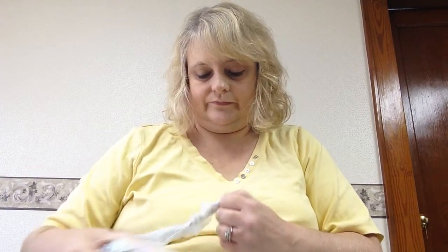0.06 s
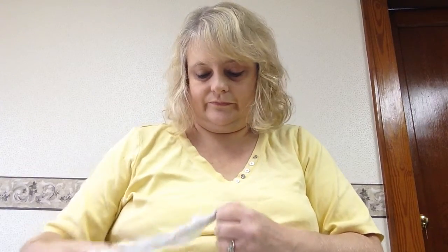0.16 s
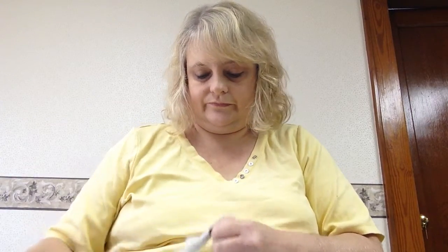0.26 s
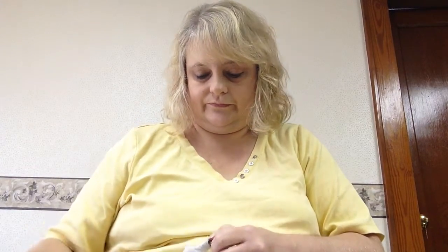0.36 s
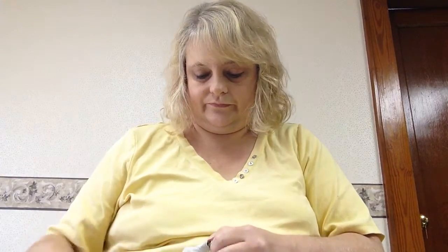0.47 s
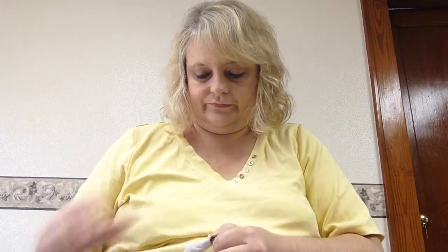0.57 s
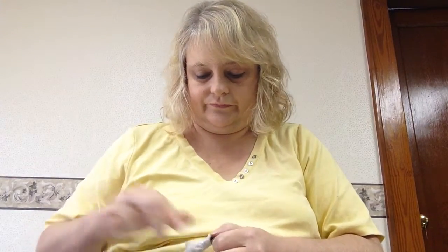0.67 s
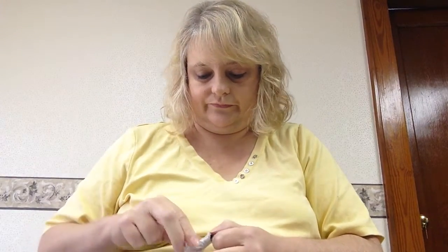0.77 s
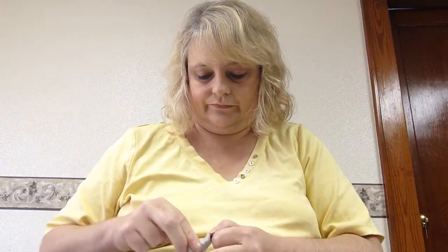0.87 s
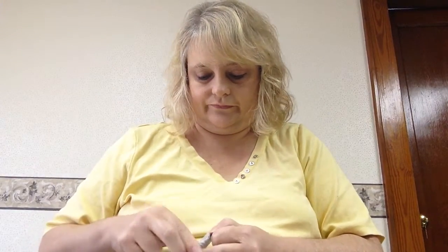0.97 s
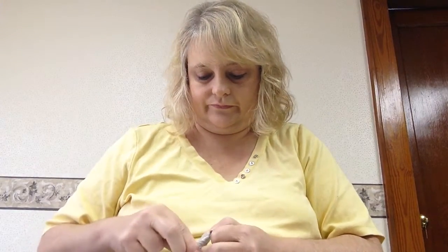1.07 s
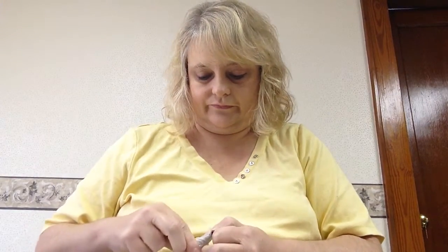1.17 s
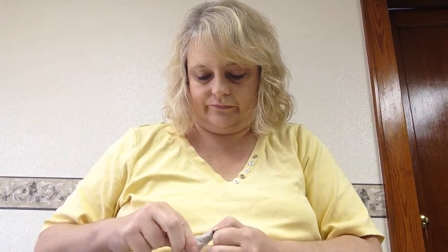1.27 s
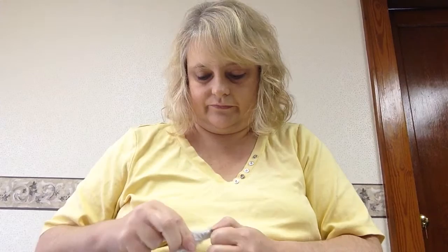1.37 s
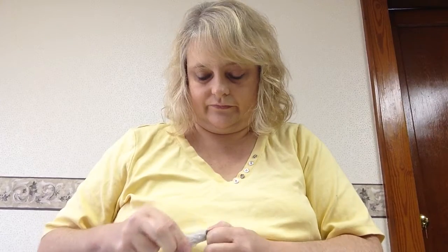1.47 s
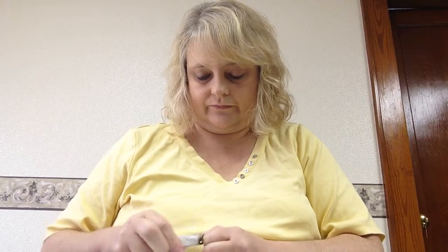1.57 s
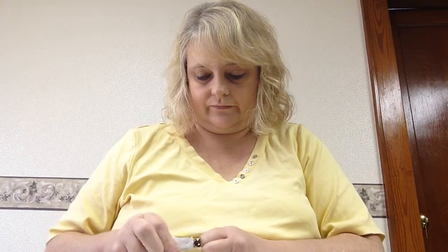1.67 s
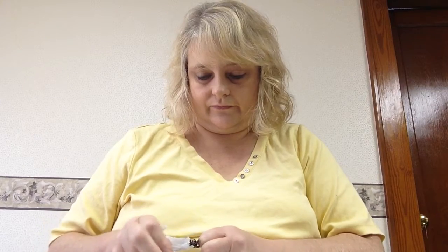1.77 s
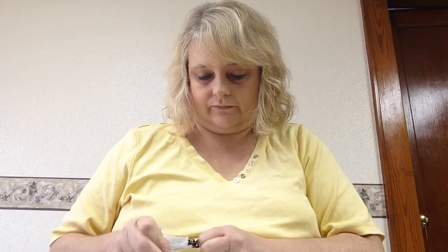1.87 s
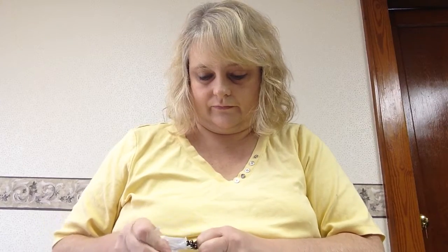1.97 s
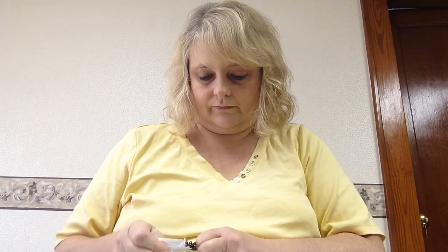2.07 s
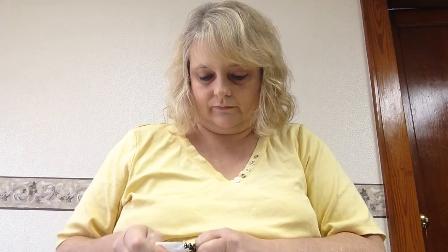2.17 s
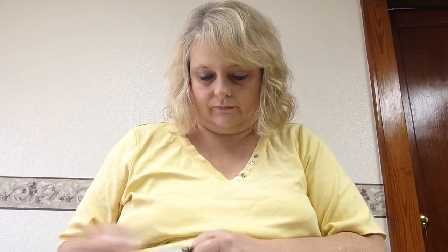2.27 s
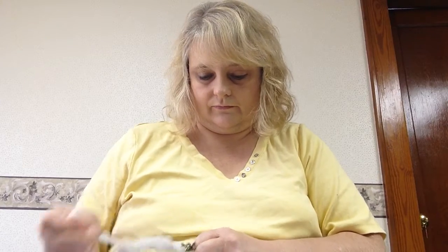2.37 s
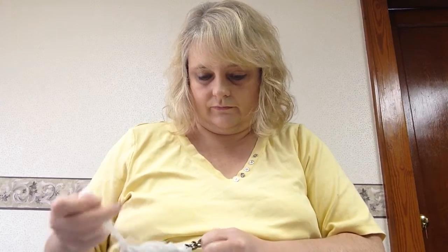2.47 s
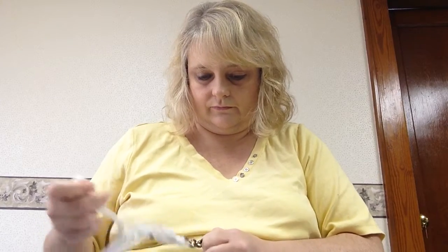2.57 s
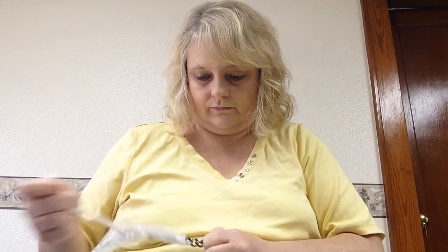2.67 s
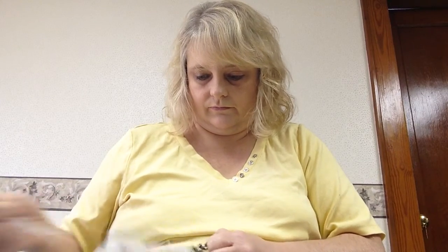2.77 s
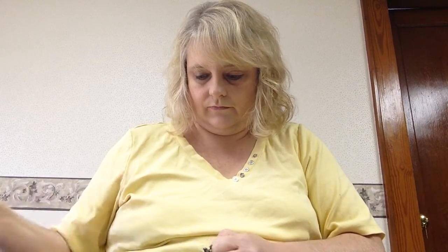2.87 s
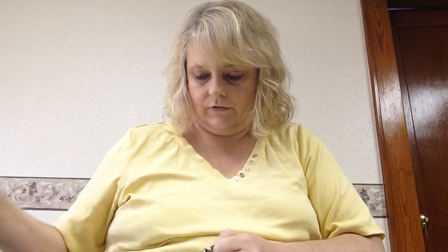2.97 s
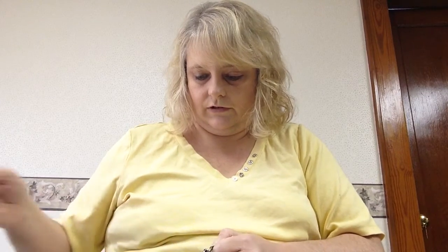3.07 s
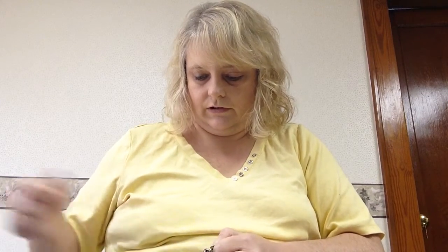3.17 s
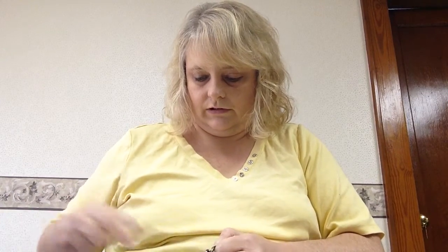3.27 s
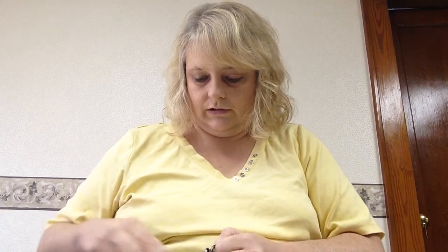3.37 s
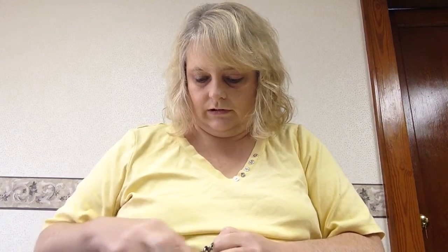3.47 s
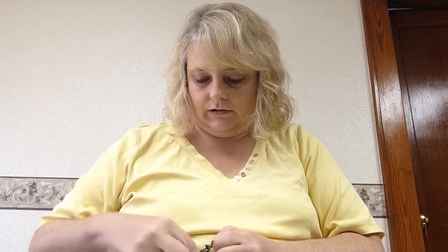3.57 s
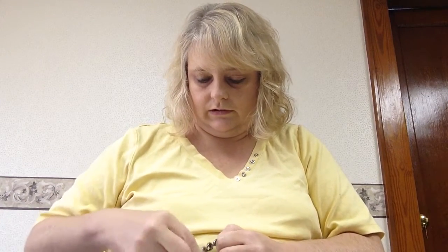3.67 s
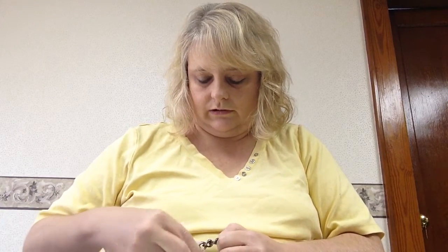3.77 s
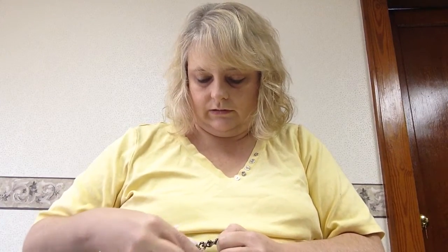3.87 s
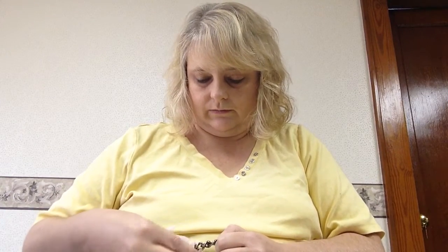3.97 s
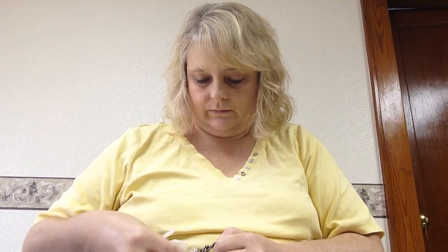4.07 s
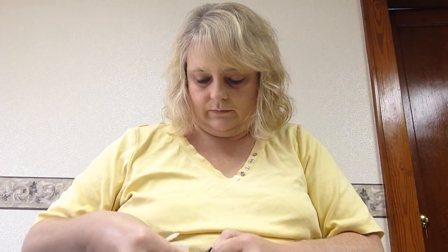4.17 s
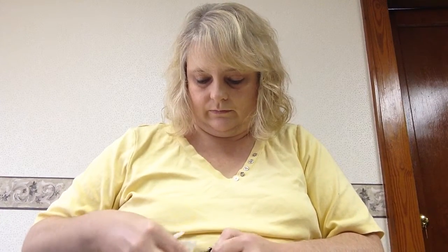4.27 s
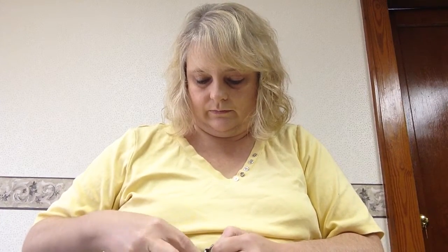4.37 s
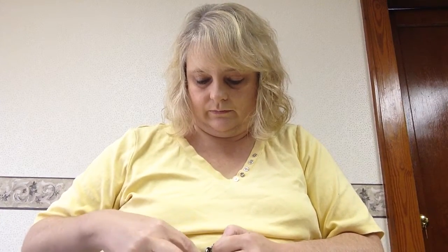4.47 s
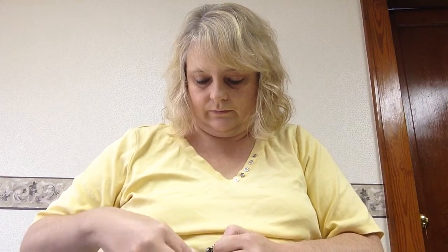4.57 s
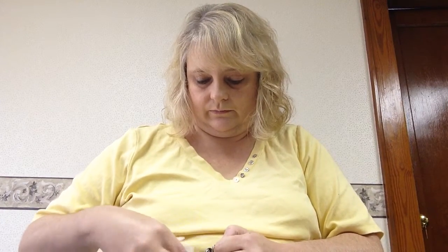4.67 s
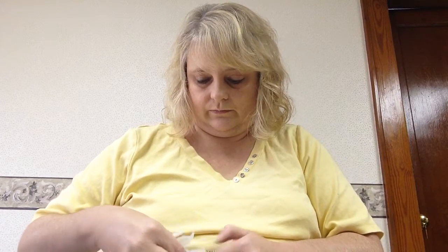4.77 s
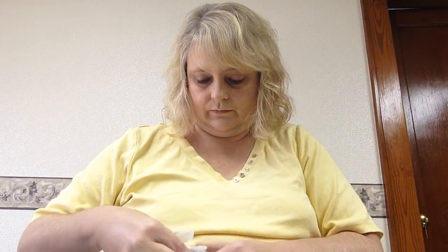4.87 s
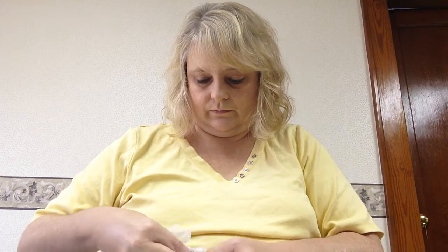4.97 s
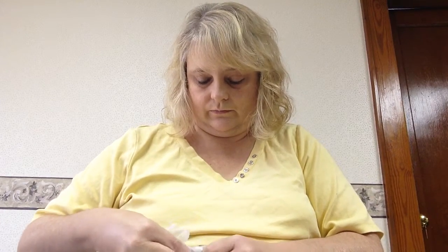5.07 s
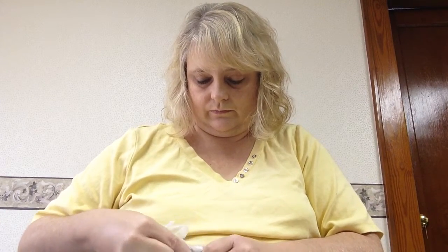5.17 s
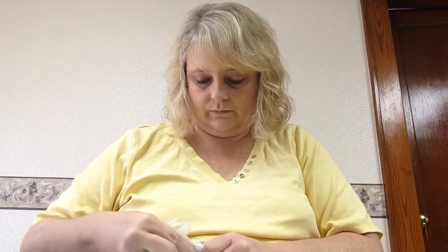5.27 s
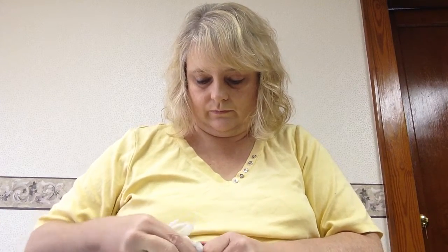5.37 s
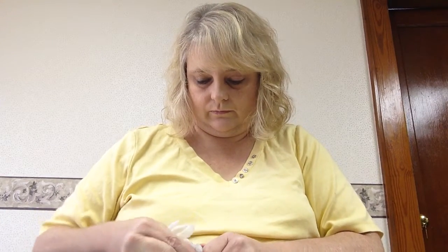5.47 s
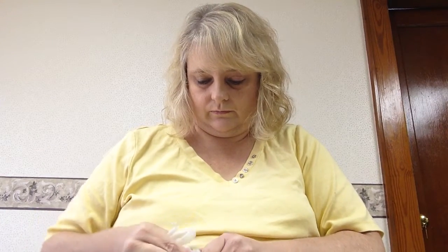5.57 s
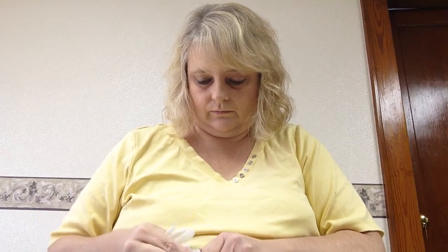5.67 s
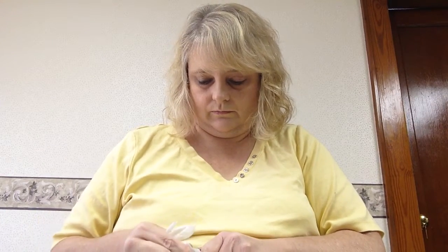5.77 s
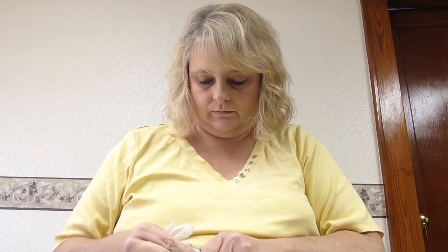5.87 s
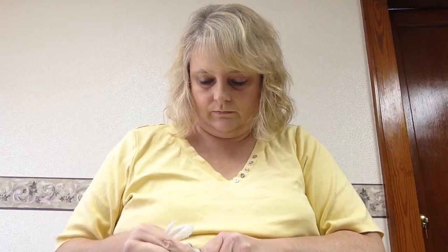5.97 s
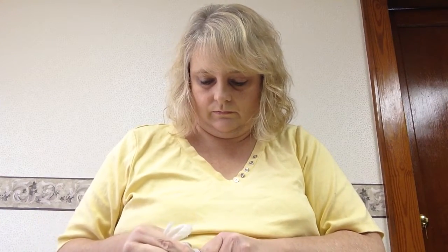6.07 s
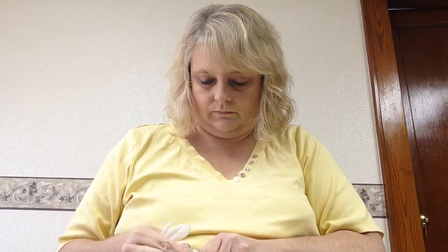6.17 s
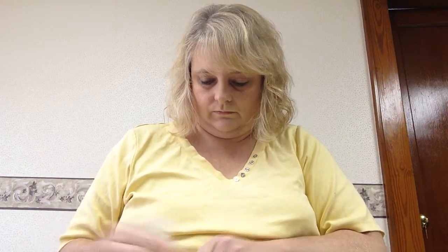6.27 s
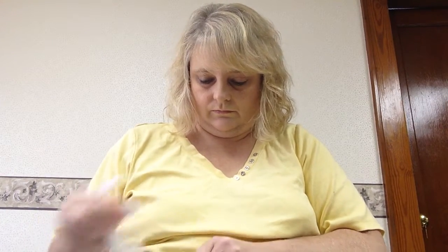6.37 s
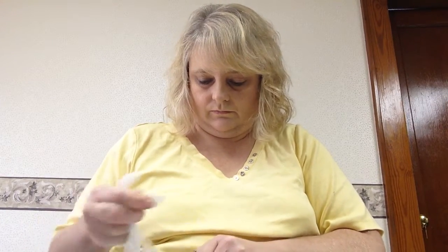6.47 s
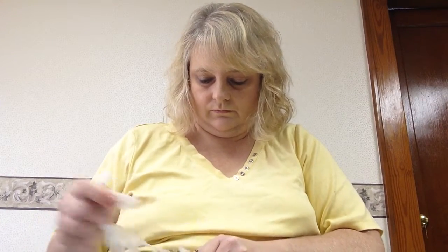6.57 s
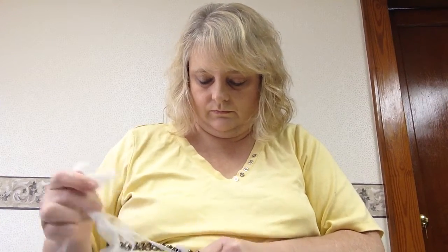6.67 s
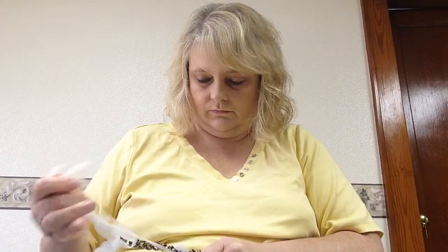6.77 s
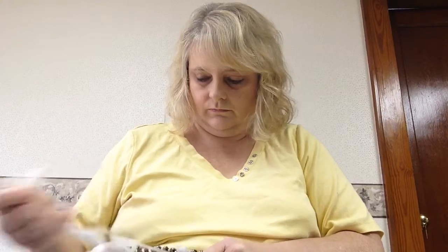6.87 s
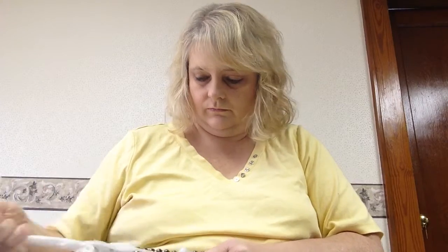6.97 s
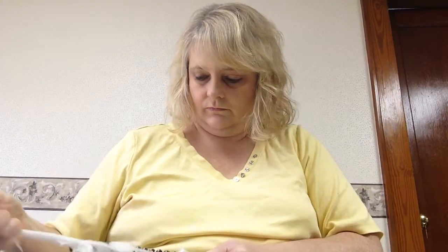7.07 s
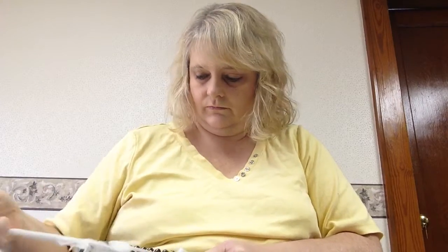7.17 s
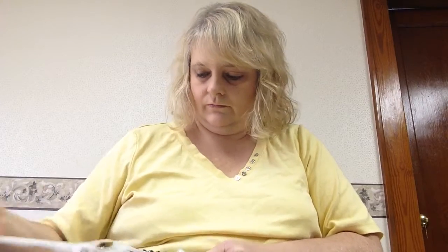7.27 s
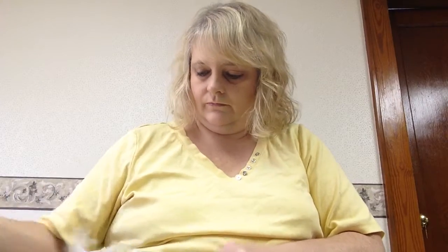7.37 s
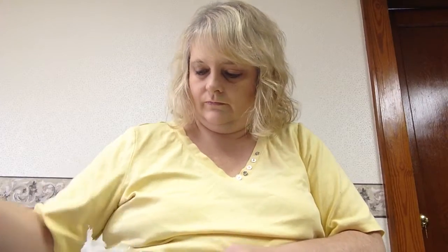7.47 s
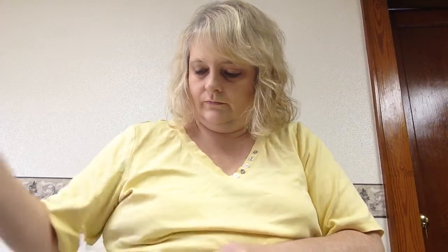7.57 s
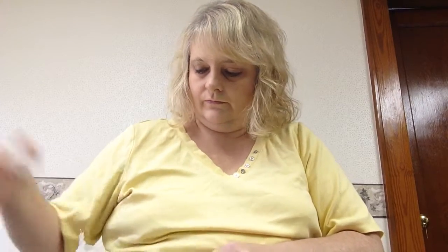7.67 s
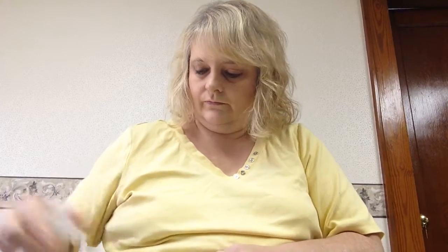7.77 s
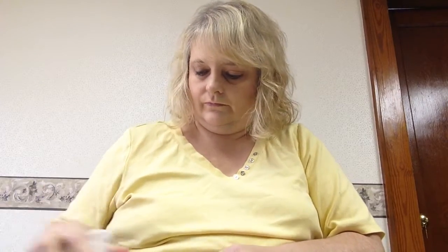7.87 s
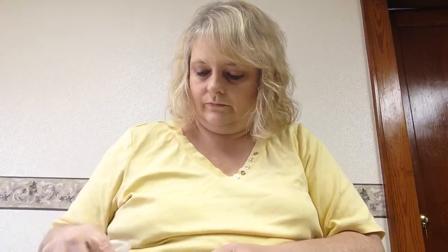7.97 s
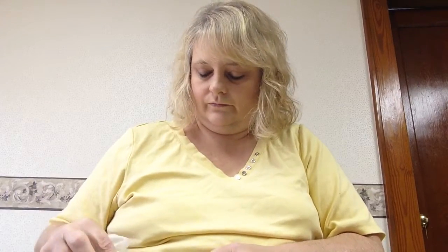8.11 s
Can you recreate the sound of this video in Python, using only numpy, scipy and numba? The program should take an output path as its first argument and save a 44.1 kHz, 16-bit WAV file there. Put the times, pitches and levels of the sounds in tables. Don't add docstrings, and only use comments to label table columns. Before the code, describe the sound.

In a small quiet room, a low, gently beating motor hum and soft air noise continue throughout. From 0 to 2.2 seconds, fingertips pick at thin plastic wrap: faint papery rustle, dry bright nicks, a soft bump near 1.2 and busier scratching around 1.5 to 1.8. At 2.3 the film tears in a sharp, bright double crackle; another crunchy burst with lower creases comes at 2.7 to 2.9. From 3 to 6.2 it is very quiet, just light fidgeting, scattered tiny ticks and a barely audible link clink near 4.9. At 6.3 to 6.4 comes the loudest rip, hard snaps with a dull knock. Smaller crinkles follow at 6.7 and 6.9 to 7.2, then the last strip crackles free at 7.25 to 7.45, with a sharp snap and faint metallic clink. Soft rustling trails to the end. Close microphone, short dull echo.

```python
import sys
import numpy as np
from scipy import signal
from scipy.fft import rfft, irfft
from scipy.io import wavfile
from scipy.ndimage import uniform_filter1d
from numba import njit

SR = 44100
rng = np.random.default_rng(int(sys.argv[2]) if len(sys.argv) > 2 else 0)


def to_linear_factor(level_db):
    exponent = np.asarray(level_db, float) / 20
    return 10 ** exponent


def file_out(sig):
    cols = np.atleast_2d(sig).T
    lim = np.clip(cols, -1, 1)
    pcm = np.round(lim * 32767).astype(np.int16)
    wavfile.write(sys.argv[1], SR, pcm)


N = 358974

# (centre [Hz], width [Hz], level [dB])
FOLDS = [(687, 760, 1.5), (1333, 1270, 3), (2200, 1530, -5.5)]
CREASES = [(3300, 2360, 1.5), (4770, 2830, 5.5), (6380, 3520, 4), (7800, 4400, -11)]
FINEST = [(10230, 5600, 2.5), (12400, 2600, -6.5), (14300, 7100, 0.5)]

# (crest [s], rustle [dB], rise [s per 20 dB], fall [s per 20 dB], finest creases [dB re rustle])
PULLS = [(2.296, -33.5, -0.0358, 0.07, -7), (2.345, -32.5, 0.0358, 0.037, -3),
         (2.372, -33.5, 0, 0.058, -0.5), (2.645, -48, 0.07, 0.21, -24), (2.74, -37, 0.0752, 0.1334, -10.5),
         (2.802, -37, -0.03, 0.0274, -25), (2.885, -51, -0.03, 0.07, -0.5), (2.96, -65.5, -0.5, 1.1, -8),
         (6.296, -48.5, 0, 0.2, 0), (6.311, -37, 0.0136, 0.0439, -4), (6.328, -33.5, 0.0153, 0.0532, -6),
         (6.352, -37.5, 0.0261, .04, -9), (6.39, -30, 0.0378, 0.0442, 0),
         (6.43, -43.5, -0.0126, 0.09, -2.5), (6.83, -54.5, 0.1, -0.2, -14), (6.862, -38, 0.01, 0.07, -7),
         (6.915, -44, 0.0141, 0, -13), (6.993, -38.5, 0.1537, 0.07, 0), (7.15, -52, 0.11, 0.13, -2.5),
         (7.292, -42.5, 0.01, 0.1149, -2), (7.345, -41, 0.006, 0.11, 0.5), (7.385, -36.5, 0.01, 0.09, -4),
         (7.425, -50, 0, 0.17, -7.5), (7.54, -50, 0.34, 0.14, -9.5)]
PICKS = [(0, -57.5, .1, 0.98, -0.5), (.361, -61, 0.67, 0.11, 0), (0.55, -65.5, 0.13, 0.12, -0.5),
         (.63, -71, 0.06, 0.093, -11), (0.818, -57, 0.008, 0.035, -29.5), (.9, -51, 0.069, 0.045, -10),
         (1.015, -54.5, .11, .035, -3.5), (1.1, -52.5, 0.097, 0.072, -9), (1.177, -60, .07, 0.18, -14),
         (1.437, -58.5, 0.06, 0.093, -4), (1.49, -63, .1, .1, -10), (1.57, -47, 0.066, 0.16, -22),
         (1.649, -45.5, 0.079, 0.064, -8), (1.805, -47, 0.038, 0.038, -6),
         (1.954, -59.5, 0.16, 0.083, -6.5), (2.063, -55.5, 0.088, 0.047, -11),
         (2.154, -50.5, 0.058, 0.076, -11.5), (2.24, -56.5, 0.065, 0.61, -13), (3.49, -61.5, 0.028, .28, 0),
         (6.165, -73, 0.035, 0.34, 3.5), (7.865, -59.5, 0.012, 0.35, -5.5)]
# (crest [s], rustle [dB], spread [s], finest creases [dB re rustle])
FIDGETS = [(2.5, -63.5, 0.25, -2), (3.06, -68, 0.072, -21), (3.19, -62, 0.13, 0), (3.321, -67, 0.074, -14),
           (3.58, -62.5, 0.11, 3), (3.69, -66.5, .12, -7), (3.865, -65, 0.13, -3.5),
           (3.94, -62.5, 0.11, -6), (4.045, -65, .08, -3), (4.145, -60.5, 0.21, -2.5),
           (4.39, -66, 0.12, -6), (4.465, -66, .05, -3), (4.52, -67, .08, -5), (4.603, -67, 0.046, 0),
           (4.701, -63, 0.46, -5), (4.999, -62.5, 0.22, -6), (5.202, -65.5, 0.094, -8.5),
           (5.332, -65, 0.1, -2), (5.443, -69, 0.31, -9), (5.646, -67, 0.36, -20), (5.744, -69.5, 0.13, 2),
           (5.903, -71, 0.08, 1.5), (6.047, -70, 0.13, -9.5), (6.56, -61.5, 0.48, -3),
           (6.671, -59, 0.18, -22), (7.266, -54.5, 0.11, 4), (7.66, -59.5, 0.27, -3.5),
           (7.76, -63, 0.037, -11), (7.97, -61, 0.2, -6.5), (8.14, -59.5, 0.21, -6)]
# (crest [s], level [dB], spread [s])
CRUMPLES = [(.05, -61, 0.65), (.36, -65.5, 0.31), (.89, -59, 0.13), (.99, -55, 0.042), (1.024, -56, 0.019),
            (1.18, -65, 0.37), (1.439, -55.5, 0.037), (1.96, -66, 0.51), (2.154, -65, 0.14),
            (2.311, -41, 0.045), (2.368, -38, 0.057), (2.73, -41.5, 0.072), (2.765, -43.5, 0.087),
            (2.81, -47.5, 0.046), (6.326, -41.5, 0.043), (6.98, -59.5, 0.073), (2.89, -48, 0.039),
            (3.55, -63.5, 0.47), (4.04, -64, 0.036), (4.25, -67, 0.43), (4.603, -58.5, 0.093),
            (6.379, -33.5, 0.055), (7.293, -46, 0.023), (7.44, -47.5, 0.22), (7.5, -53, .08),
            (7.555, -49, 0.08)]

# (time [s], peak [dB], main ring [Hz], second ring [Hz])
NICKS = [(0.077, -35.5, 7900, 700), (0.0798, -37.5, 3700, 7100), (0.1254, -34, 7100, 12600),
         (0.2553, -41, 3960, 11900), (0.2816, -41, 12600, 8400), (0.4107, -46, 10300, 3500),
         (0.4734, -50, 6700, 2000), (0.4952, -47, 9400, 7000), (0.5421, -42, 7460, 10600),
         (0.805, -34.5, 8260, 11200), (0.8085, -42, 1200, 7900), (0.882, -41, 6700, 4400),
         (1.0234, -42, 1400, 1500), (1.131, -40, 6270, 2100), (1.1344, -41, 2400, 6700),
         (1.158, -37.5, 3530, 8400), (1.1725, -32.5, 1190, 2200), (1.1746, -39, 1000, 2900),
         (1.212, -40, 7040, 7060), (1.2308, -47, 7100, 7500), (1.3685, -46, 5940, 10600),
         (1.387, -45.5, 2600, 5600), (1.3958, -46, 5600, 14100)]
CREEPS = [(1.4277, -40, 5300, 6700), (1.4316, -38, 5040, 5330), (1.4352, -37, 5300, 5300),
          (1.44, -35.5, 5900, 6700), (1.492, -33.5, 6300, 5900), (1.496, -38.5, 1690, 5600),
          (1.5795, -33, 6700, 2200), (1.6157, -32, 7800, 7100), (1.6995, -40, 8400, 6300),
          (1.7068, -47, 7500, 700), (1.7132, -44, 7100, 9400), (1.7298, -43, 8400, 6300),
          (1.7431, -39, 7900, 8400), (1.7516, -39, 7500, 8400), (1.762, -45, 7900, 7900),
          (1.8012, -36.5, 2400, 2200), (1.803, -39, 3300, 6700), (1.804, -34, 8900, 2200),
          (1.806, -29.5, 7160, 6750), (2.0672, -33, 7400, 6200), (2.1899, -45, 1400, 11200),
          (2.2321, -48, 11200, 3500)]
CRACKS = [(2.284, -33, 6300, 3100), (2.2898, -23, 6300, 7500), (2.2943, -17, 8400, 4700),
          (2.2957, -16, 6300, 4700), (2.2974, -20, 8900, 2500), (2.3585, -14, 6300, 13000),
          (2.3616, -12, 3000, 12800), (2.3643, -13, 2900, 9500), (2.3622, -17, 6300, 2800),
          (2.371, -21, 3300, 11900), (2.3845, -26, 7900, 5000), (2.4477, -35, 7500, 3300),
          (2.4955, -42, 10000, 4700), (2.5771, -45, 8900, 5000), (2.6153, -47, 3100, 1800),
          (2.6376, -40, 4000, 1100), (2.6498, -38, 3300, 4000), (2.6533, -37, 4000, 3000),
          (2.6571, -37, 4200, 3000), (2.68, -35, 7100, 3000), (2.6982, -31, 5600, 2200),
          (2.718, -26, 2400, 5600), (2.7272, -24, 2400, 4400), (2.7396, -22, 7100, 1700),
          (2.7419, -28, 2200, 6700), (2.7478, -29, 3300, 2200), (2.7515, -32, 2800, 1500),
          (2.7538, -26, 2200, 4400), (2.7565, -27, 7500, 3000), (2.7596, -29, 3000, 7000),
          (2.7637, -28, 3700, 1200), (2.7804, -27, 1400, 4400), (2.7846, -29, 3700, 5600),
          (2.7964, -12, 3000, 6000), (2.7972, -13, 2900, 1500), (2.8009, -28, 4700, 3100),
          (2.8057, -13, 2900, 6200), (2.8051, -19, 2600, 5200), (2.8913, -35, 4200, 10600),
          (2.8978, -35, 10600, 4400)]
TICKS = [(3.023, -48, 900, 2500), (3.2848, -41.5, 7200, 3140), (3.3714, -42, 5900, 10000),
         (3.3741, -52, 8900, 6700), (3.4776, -43, 5600, 700), (3.497, -37, 6700, 800),
         (3.6805, -48, 7500, 1600), (4.032, -38, 1660, 697), (4.1454, -38.5, 1300, 8500),
         (4.226, -46, 2000, 4400), (4.25, -47, 2000, 7900), (4.2873, -42, 5570, 8400),
         (4.62, -46, 1300, 2400), (4.7695, -44, 9200, 5600), (4.8481, -48.5, 5300, 3500),
         (4.9083, -52, 8400, 2500), (4.937, -42, 10000, 10600), (5.011, -45, 7550, 3500),
         (5.0931, -58, 9400, 2800), (5.1343, -54, 6300, 5900), (5.151, -45.5, 5600, 8900),
         (5.3, -49, 5000, 2100), (5.3344, -42.5, 4740, 7100), (5.365, -44.5, 5300, 11900),
         (5.4409, -44, 8000, 11000), (5.4737, -46.5, 4500, 3200), (5.6458, -37, 2500, 7900),
         (5.7338, -54, 3700, 6300), (5.736, -49, 5000, 700), (5.738, -50, 5600, 3500),
         (5.741, -45, 5600, 3300), (5.7679, -37.5, 1810, 3300), (5.7837, -46, 5300, 10000),
         (5.8152, -48.5, 7100, 11200), (5.898, -41.5, 8400, 700), (5.902, -44.5, 6770, 6300),
         (5.9802, -48.5, 7450, 7100), (5.9985, -49, 6700, 6700), (6.158, -46, 3000, 11200),
         (6.159, -43, 9300, 9400), (6.185, -44, 6330, 11200), (6.2003, -51, 10000, 6700),
         (6.2105, -48, 7500, 11900), (6.2445, -49, 7100, 3100), (6.2463, -49, 7100, 2500)]
RIP = [(6.2936, -37, 7100, 2200), (6.3143, -31, 1600, 5600), (6.3209, -23, 8400, 6700),
       (6.3243, -21, 9400, 4400), (6.3264, -17, 7900, 4200), (6.3282, -12, 7100, 3300),
       (6.3298, -15, 1300, 3700), (6.3622, -9, 4400, 11900), (6.3634, -10, 11900, 4700),
       (6.3662, -12, 4800, 9800), (6.3679, -15, 5000, 11500), (6.3716, -15, 4800, 10800),
       (6.3728, -12, 1500, 8600), (6.3806, -20, 7500, 1800), (6.3852, -13, 5900, 10000),
       (6.3886, -10, 7900, 5600), (6.39, -14, 4800, 8400), (6.3932, -15, 5300, 3500),
       (6.3956, -16, 7900, 3500), (6.4498, -29, 7100, 2500), (6.5407, -42, 1900, 4000),
       (6.6295, -37, 5900, 2400), (6.6354, -44, 5600, 2400), (6.6385, -38, 7100, 1900),
       (6.6658, -39, 5300, 11200), (6.6712, -23, 6700, 3700), (6.6783, -40, 4200, 6300),
       (6.6939, -35, 4400, 6300), (6.7058, -39, 5300, 1700), (6.7265, -31, 2100, 8400),
       (6.7372, -34, 4700, 1600), (6.7737, -46, 6700, 4000)]
CRINKLES = [(6.8024, -44, 7900, 14100), (6.8263, -36, 7100, 2200), (6.8283, -31, 6300, 2200),
            (6.832, -35, 6300, 2200), (6.8577, -30, 8400, 5900), (6.862, -21, 6700, 5300),
            (6.8651, -26, 7900, 5000), (6.8668, -29, 7900, 3700), (6.9146, -25, 5000, 5000),
            (6.9168, -28, 5600, 10000), (6.9273, -25, 4700, 6300), (6.9742, -27, 5600, 3000),
            (6.992, -30, 1900, 5000), (7.0683, -40, 8400, 5300), (7.0935, -40, 6300, 3100),
            (7.1116, -39, 6700, 3100), (7.1251, -40, 3300, 6300), (7.1339, -38, 4400, 8400),
            (7.1412, -35, 8900, 5600), (7.1459, -36, 4700, 8400), (7.1496, -37, 4700, 10000),
            (7.1524, -37, 7500, 3100), (7.1565, -37, 7500, 4000), (7.208, -41, 6300, 8400),
            (7.2285, -23, 4700, 8900)]
STRIP = [(7.2581, -33, 6300, 8900), (7.2764, -31, 8400, 5000), (7.285, -21, 5600, 10000),
         (7.289, -31, 8900, 4700), (7.2931, -29, 7900, 5300), (7.2971, -18, 11900, 5300),
         (7.3332, -24, 4700, 8400), (7.3357, -23, 5900, 11900), (7.3389, -27, 9400, 5900),
         (7.341, -24, 10000, 5900), (7.3704, -20, 5600, 11200), (7.3787, -17, 5000, 10600),
         (7.3808, -26, 8400, 5000), (7.3986, -26, 8900, 3700), (7.4009, -23, 2200, 9400),
         (7.4115, -11, 2900, 8600), (7.4121, -18, 4800, 2600), (7.5203, -37, 1100, 2100),
         (7.5435, -35, 1000, 5000), (7.591, -42, 3700, 6700), (7.6654, -41, 3700, 2500), ]

# (crest [s], level [dB], spread [s], centre [Hz])
RUBS = [
    (.362, -58, 0.043, 800),
    (2.825, -46.5, 0.061, 2980),
    (.82, -66.5, 0.03, 3500),
    (1.595, -56, 0.041, 2200),
    (1.65, -54.5, 0.04, 2200),
    (3.057, -58, .04, 4400),
    (4.4, -71.5, 0.37, 2200),
    (7.44, -51, 0.049, 970),
    (7.53, -50.5, 0.065, 1290),
]
# (time [s], lower ring [Hz], lower ring [dB], upper ring [dB])
CLINKS = [
    (0.543, 7800, -63, -64),
    (.557, 7600, -62.5, -60),
    (0.591, 7700, -68, -66),
    (4.908, 7860, -57, -54.5),
    (4.939, 7900, -68, -61.5),
    (4.989, 8200, -54, -64.5),
    (7.437, 7700, -60, -51),
]
# (time [s], peak [dB], centre [Hz])
BUMPS = [(0.346, -45, 645), (1.17, -40, 930), (2.634, -41.5, 307), (2.797, -32, 580), (4.847, -45.5, 427),
         (4.871, -46.5, 428), (6.326, -31, 844), (6.371, -27, 1320), (6.947, -42.5, 290),
         (6.992, -41.5, 493), (7.41, -35, 905), (7.994, -45, 550)]
# (frequency [Hz], level [dB rms], first crest [s])
HUM = [(55.84, -65.3, 0.0138), (58.94, -70.3, 0.0007), (74.31, -67.3, 0.0005), (111.41, -67.7, 0.0083),
       (116.79, -76.1, 0.0027), (117.88, -60.5, 0.0048), (120.0, -66.5, 0.0033), (148.58, -75.6, 0.0047),
       (235.83, -80.6, 0.0011), (240.14, -83.0, 0.0031)]
# (frequency [Hz], density [dB per Hz])
AIR = [(30, -16.5), (50, -18), (90, -9.5), (125, 3), (200, -6), (310, -10.5), (470, -7.5), (600, -14.5),
       (960, -21), (3200, -34), (7500, -40), (13300, -56), (15500, -45)]

REST_DB = -86
BEND = 1.094
FIDGET_RISE, CRUMPLE_RISE = 0.69, 0.58
PULL_FOLDS_DB, PICK_FOLDS_DB, FIDGET_FOLDS_DB = -11.5, -17, -6
TILT = 0.14
SNAP_S = 0.00017
LINK_UPPER_HZ, LINK_T60_S = 9650, 0.054
AIR_DB = -61.5
ROOM_T60_S, ROOM_DAMP, ROOM_DB = 0.26, 0.36, -19.5
TOP_HZ = 15150
STEP = 32


def level(x, db):
    return x * to_linear_factor(db) / np.sqrt(np.mean(x ** 2))


def band(x, hz, width_hz):
    edges_hz = np.clip([hz - width_hz / 2, hz + width_hz / 2], 20, 0.45 * SR)
    return signal.sosfilt(signal.butter(2, edges_hz, "bandpass", fs=SR, output="sos"), x)


def walk(rate_hz):
    hold = int(SR / rate_hz)
    held = np.repeat(rng.standard_normal(N // hold + 1), hold)
    slewed = uniform_filter1d(uniform_filter1d(held, hold), hold)
    return 1.05 * slewed[:N]


def add(track, s, sound):
    i = int(s * SR)
    track[i:i + len(sound)] += sound[:N - i]


def swell(s, db, rise_s, fall_s):
    lag_s = np.arange(0, N, STEP) / SR - s
    away = np.where(lag_s < 0, -lag_s / max(rise_s, 0.004), lag_s / max(fall_s, 0.004))
    return to_linear_factor(2 * (db - 20 * away ** BEND))


def handling():
    fidgets = [(s, db, FIDGET_RISE * spread_s, spread_s, fine_db) for s, db, spread_s, fine_db in FIDGETS]
    moves = PULLS + PICKS + fidgets
    power = np.array([swell(*move[:4]) for move in moves])
    rest = to_linear_factor(2 * REST_DB)
    total = power.sum(axis=0) + rest
    finest = to_linear_factor(2 * np.array(moves)[:, -1]) @ power + rest
    counts = [len(PULLS), len(PICKS), len(FIDGETS)]
    shares_db = np.repeat([PULL_FOLDS_DB, PICK_FOLDS_DB, FIDGET_FOLDS_DB], counts)
    folds = to_linear_factor(2 * shares_db) @ power + rest
    for s, db, spread_s in CRUMPLES:
        folds = folds + swell(s, db, CRUMPLE_RISE * spread_s, spread_s)
    points = np.arange(0, N, STEP)
    rustle_db, folds_db, finest_db = [np.interp(np.arange(N), points, 10 * np.log10(p))
                                      for p in (total, folds, finest)]
    return rustle_db, folds_db - rustle_db, finest_db - rustle_db


def rustle():
    rustle_db, folds_db, finest_db = handling()
    slip_db = walk(45) + 1.2 * walk(300)
    out = 0
    for family, share_db in ((FOLDS, folds_db), (CREASES, 0), (FINEST, finest_db)):
        sizes = to_linear_factor(1.57 * rng.exponential(size=N)) * (rng.random(N) < 0.3)
        buckles = sizes * rng.standard_normal(N) * to_linear_factor(slip_db)
        lean = TILT * (finest_db + 7.5) * (family is CREASES)
        ring = 0
        for hz, width_hz, db in family:
            patch_db = 2.2 * walk(25)
            ring = ring + to_linear_factor(db + lean * np.log2(hz / 5000) + patch_db) * band(buckles, hz, width_hz)
        out = out + level(ring, -1.13) * to_linear_factor(rustle_db + share_db)
    return out


def snaps():
    out, size = np.zeros(N), 256
    t, hz = np.arange(size) / SR, np.fft.rfftfreq(size, 1 / SR) + 1
    release = (t / SNAP_S) * np.exp(-t / SNAP_S) + 0.07 * np.exp(-t / 0.0015)
    low_cut = np.clip(hz / 400, 0, 1)
    for s, db, main_hz, second_hz in NICKS + CREEPS + CRACKS + TICKS + RIP + CRINKLES + STRIP:
        burst = rfft(np.roll(rng.standard_normal(size) * release, 40))
        burst /= np.sqrt(uniform_filter1d(np.abs(burst) ** 2, size=9)) ** 0.8
        main, second = [np.exp(-0.5 * ((hz - ring_hz) / (450 + 0.16 * ring_hz)) ** 2)
                        for ring_hz in (main_hz, second_hz)]
        spill = 0.15 * to_linear_factor((db + 20) / 4)
        snap = irfft(burst * (spill + main + 0.7 * second) * low_cut)
        peak = np.abs(snap).max()
        add(out, s - np.abs(snap).argmax() / SR, snap * to_linear_factor(db) / peak)
    return out


def rubs():
    grains = rng.standard_normal(N) * to_linear_factor(3 * walk(200))
    out = np.zeros(N)
    for s, db, spread_s, hz in RUBS:
        envelope = np.repeat(np.sqrt(swell(s, db, spread_s, spread_s)), STEP)[:N]
        out += level(band(grains, hz, 0.5 * hz), 0) * envelope
    return out


def chain():
    out, t = np.zeros(N), np.arange(SR // 8) / SR
    decay = np.exp(-np.log(1000) * t / LINK_T60_S)
    for s, lower_hz, lower_db, upper_db in CLINKS:
        for hz, db in ((lower_hz, lower_db), (LINK_UPPER_HZ, upper_db)):
            add(out, s, to_linear_factor(db) * np.sin(2 * np.pi * hz * t) * decay)
    return out * to_linear_factor(4.8 * walk(150))


def bumps():
    out, t = np.zeros(N), np.arange(SR // 8) / SR
    for s, db, hz in BUMPS:
        push_s = 0.0032 * to_linear_factor(-0.15 * (db + 33))
        push = rng.standard_normal(len(t)) * t * np.exp(-t / push_s)
        knock = band(push, hz, 0.6 * hz)
        add(out, s, knock * to_linear_factor(db - 2.0) / np.abs(knock).max())
    return out


@njit
def walls(x, lags, gain, damp):
    line, soft, out = np.zeros((8, 4096)), np.zeros(8), np.zeros(len(x))
    for i in range(len(x)):
        total = 0.
        for k in range(8):
            soft[k] += (1 - damp) * (gain[k] * line[k, (i - lags[k]) & 4095] - soft[k])
            total += soft[k]
            out[i] += soft[k] * (1 - 2 * (k % 2))
        for k in range(8):
            line[k, i & 4095] = x[i] + soft[k] - total / 4
    return out


def appliances():
    t = np.arange(N) / SR
    tones = np.zeros(N)
    for hz, db, crest_s in HUM:
        tones += np.sqrt(2) * to_linear_factor(db) * np.cos(2 * np.pi * hz * (t - crest_s))
    air_hz, air_db = np.transpose(AIR)
    log_hz = np.log(np.fft.rfftfreq(N, 1 / SR) + 1)
    colour = to_linear_factor(np.interp(log_hz, np.log(air_hz), air_db))
    air = irfft(rfft(rng.standard_normal(N)) * colour, N)
    return tones + level(air, AIR_DB)


def scene():
    near = rustle() + snaps() + rubs() + chain() + bumps()
    lags = np.array([457, 613, 787, 971, 1193, 1423, 1657, 1901])
    gain = to_linear_factor(-60 * lags / SR / ROOM_T60_S)
    room = walls(near + 1e-18, lags, gain, ROOM_DAMP)
    return (near + to_linear_factor(ROOM_DB) * room + appliances())[None]


def band_limit(x):
    return signal.sosfilt(signal.butter(12, 16470, fs=SR, output="sos"), x)


def record(dry):
    top_cut = signal.ellip(10, 0.2, 50, TOP_HZ, fs=SR, output="sos")
    mix = signal.sosfilt(top_cut, np.tanh(dry))
    return band_limit(mix)


dry = scene()
out = record(dry)
file_out(out)
```